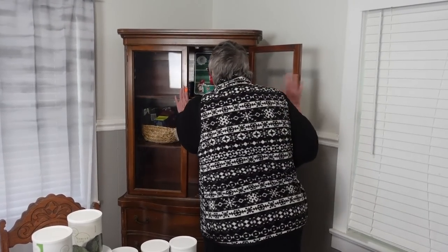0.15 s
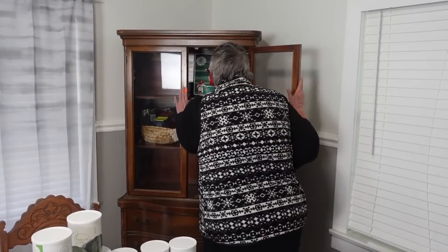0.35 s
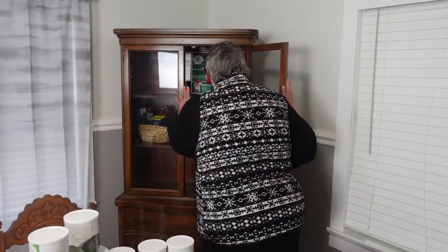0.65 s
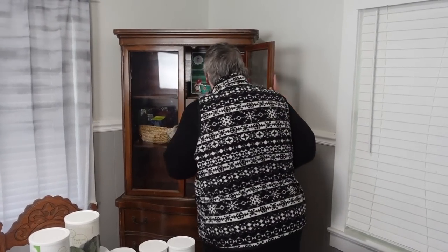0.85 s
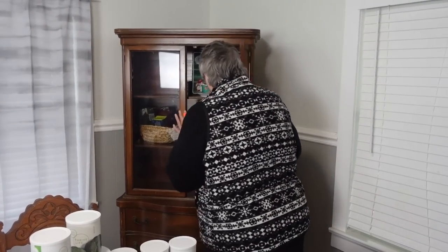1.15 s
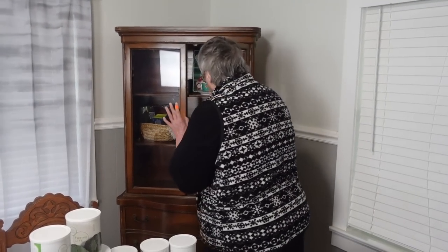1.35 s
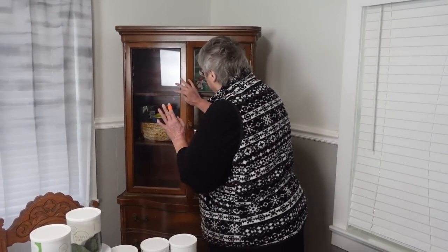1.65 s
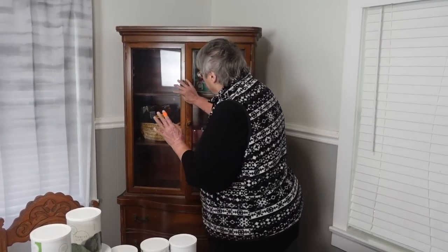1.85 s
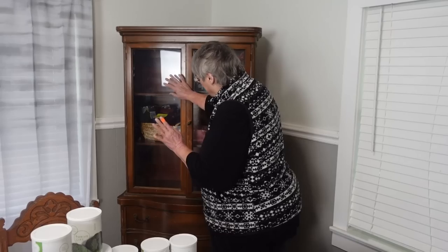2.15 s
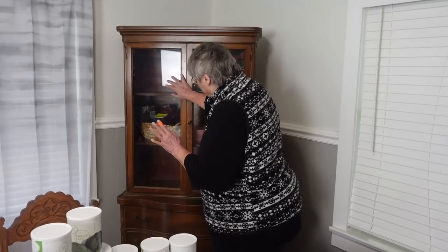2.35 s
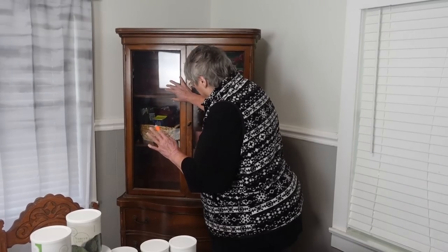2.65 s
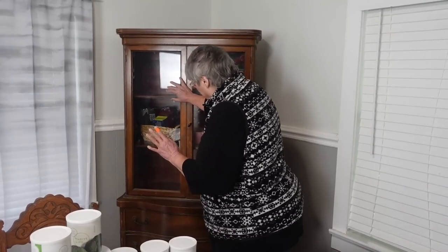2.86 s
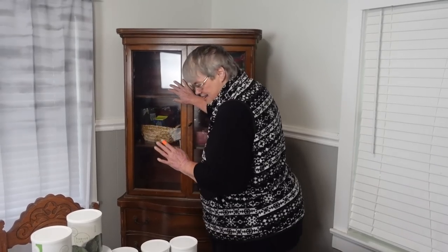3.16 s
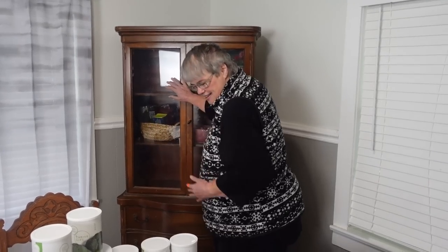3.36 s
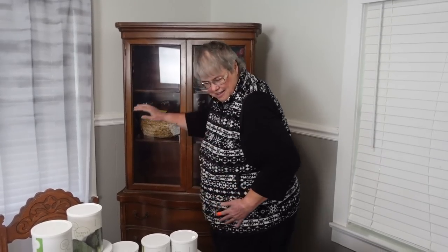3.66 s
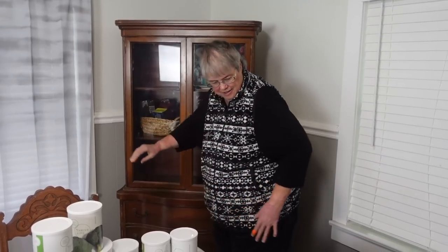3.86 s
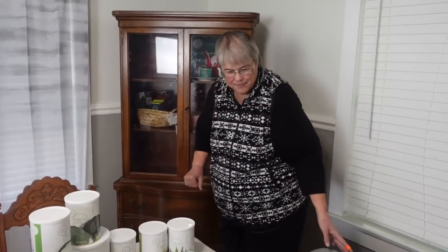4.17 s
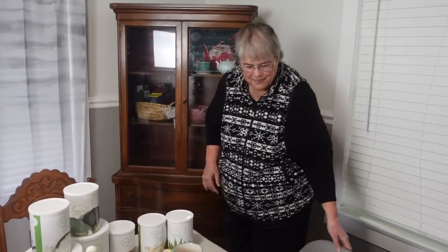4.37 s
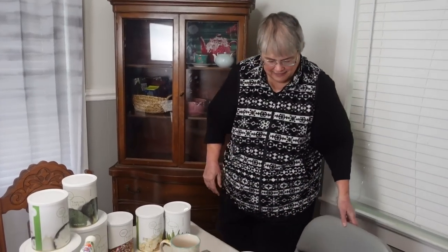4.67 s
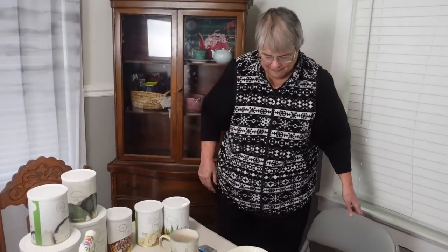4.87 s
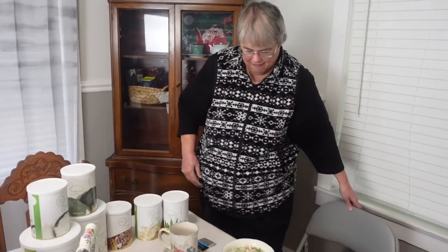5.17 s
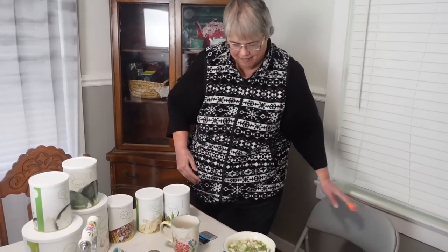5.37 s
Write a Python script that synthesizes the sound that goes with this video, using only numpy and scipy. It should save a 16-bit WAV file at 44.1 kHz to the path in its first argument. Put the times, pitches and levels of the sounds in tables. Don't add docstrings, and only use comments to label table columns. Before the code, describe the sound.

Heard from a few metres away in an echoing home: one sharp boomy wooden bang with a small rebound, a lull, faint sole rubs, then another bang with rattling glass. Light footfalls and scuffs move about. Near the end, chair feet tick and grate on boards, the tube frame hums and rattles, and the legs slam down twice. The limiter flattens loud peaks over steady soft hiss.

```python
import sys
import numpy as np
from scipy import signal
from scipy.io import wavfile
from scipy.ndimage import uniform_filter1d

SR = 44100
rng = np.random.default_rng(int(sys.argv[2]) if len(sys.argv) > 2 else 0)


def log_audio(samples):
    frames = np.atleast_2d(samples).T
    limited = np.clip(frames, -1, 1)
    pcm = np.round(limited * 32767).astype(np.int16)
    wavfile.write(sys.argv[1], SR, pcm)


def volts(x):
    e = np.asarray(x, float) / 20
    return 10 ** e


N = 243431

BAND_EDGES = 36 * 2 ** np.arange(0, 9.1, 1 / 3)

RUMBLE_LOW_HZ, RUMBLE_HIGH_HZ = 12.85, 22.94
RUMBLE_DB, RUMBLE_EVENING_S = -20, 0.49

# frequency in Hz, level in dB per Hz.
HISS_COLOUR = [(38, -21), (60, -26.5), (120, -24), (170, -25.5), (270, -19.5), (650, -32.5), (1200, -35),
               (2100, -35), (4800, -43), (8000, -50), (16000, -55.5)]
HISS_DB = -47.5

# start in seconds, level in dB.
FLOOR_LOADS = [(0.07, -29), (0.3, -4), (1.2, -40), (1.68, -27), (2.03, -2), (2.18, -9.5), (2.33, -25),
               (2.442, 0), (2.56, -12), (2.97, -26), (3.24, -19), (4.07, -11.5), (4.3, -21), (4.52, -30),
               (4.95, 1.5), (5.1, 0), (5.38, -24)]
# frequency in Hz, level in dB per Hz.
FLOOR_COLOUR = [(38, -28), (60, 0), (90, -4), (140, -9.5), (300, -90), (16000, -120)]
FLEX_RISE_S, FLEX_T60_S, FLEX_REST_DB = 0.0086, 0.58, -34

# frequency in Hz, time to fall by 60 dB in seconds.
ROOM_T60 = [(50, 0.95), (120, 0.47), (300, 0.63), (1000, 0.65), (3000, 0.55), (4900, 0.68), (7500, 0.59),
            (16000, 0.22)]
ROOM_DB, ROOM_BUILD_S = 3.5, 0.0014

# time in seconds, level in dB.
CREAK = [(2.85, -58), (2.896, -71), (3.108, -62), (3.16, -82), (3.208, -49), (3.3, -68)]
# frequency in Hz, width in Hz, level in dB.
CREAK_TONES = [(2020, 78, 3), (4300, 170, -14.5)]
# frequency in Hz, level in dB, time to fall by 60 dB in seconds.
RIVET_MODE = [(12000, -36, 0.2)]

# start in seconds, force in dB, brightness in dB per octave.
TICKS = [(0.2783, -6.5, 6), (0.503, -26.5, 3.5), (0.98, -47, 3.5), (1.262, -42, 1), (2.4257, -1.5, -16),
         (2.4388, -22, -2), (2.6594, -21, -1), (2.9467, -49, 2.5), (3.0947, -38, 1.3), (3.4415, -22.5, -1),
         (4.4052, -25, 1.5), (4.4547, -33, 2.2), (4.4644, -36, 4), (4.5366, -30.5, 2), (4.6796, -32.5, 5),
         (4.758, -23, -2), (5.0893, -18, -3)]
# frequency in Hz, level in dB per Hz.
TICK_COLOUR = [(200, 11), (800, 15.5), (3000, 4.5), (8000, -5), (16000, -19)]
TICK_T60_S, TICK_ROOM_DB = 0.024, -5

# time of fullest sound in seconds less the speeding up, speeding up
# in seconds, slowing down in seconds, level in dB, brightness in dB per octave.
SHUFFLES = [(-0.05, 0.036, 0.02, -13, -4), (0.07, 0.035, 0.39, -40, -6), (0.78, 0.13, .08, -54, 3),
            (0.95, 0.12, 0.27, -46.5, 2.3), (1.42, 0.027, 0.056, -41.5, -3), (1.501, 0.14, 0.1, -25.5, 0),
            (1.9, 0.15, 0.16, -21.5, -0.95), (2.3, 0.12, 0.053, -32, -2.5), (3.27, 0.09, 0.16, -44, -3),
            (3.43, 0.084, 0.11, -28.5, 1.7), (3.68, 0.085, 0.077, -42, -1.5),
            (3.798, 0.042, .075, -29, -0.9), (4.071, 0.041, 0.097, -23, 1.4), (4.24, 0.043, .085, -29, 2.3),
            (4.9, 0.033, .19, -39, 1), (5.12, 0.11, 0.78, -34, -2), (5.45, 0.12, .05, -60, 15)]
# frequency in Hz, level in dB per Hz.
SOLE_COLOUR = [(40, 1), (120, -18.5), (250, -7), (600, -3), (1500, -4.5), (3000, -6), (4800, -7.5),
               (7000, -17), (11000, -24.5), (16000, -30.5)]
SET_OFF_DB, COME_TO_REST_DB = -14.5, -16
DULLING_DB_PER_OCTAVE = -3
LIGHT_TOUCH_DB_PER_OCTAVE = 0
PATCHY_DB, PATCHES_PER_S = 2.5, 6.1

# start in seconds, force in dB, brightness in dB per octave, body ring in dB.
STEPS = [(1.919, -22, 2.8, -14), (1.948, -25.5, -3, -26), (2.051, -15.5, -1.3, -19),
         (2.309, -25.5, -7, -17), (2.349, -25.5, -3, -3), (2.855, -28, -2, 11), (3.181, -19.5, -2, 3),
         (3.19, -21, 5, -3), (3.208, -19.5, -2, -5.5), (3.44, -28.5, 4, 0), (3.83, -43, 9, -10),
         (4.078, -14.5, 8, 1), (4.29, -30, -0.5, 2)]
# frequency in Hz, level in dB per Hz.
STEP_CRACK = [(40, 5.5), (100, -5), (250, -4), (500, -13), (900, -17), (1500, -25.5), (4000, -33.5),
              (7000, -52), (16000, -90)]
# frequency in Hz, level in dB, time to fall by 60 dB in seconds.
BOARD_MODES = [(61, -20, 0.1), (106, 7.5, 0.28), (254, -21, 0.073), (494, 5.5, 0.075), (600, 2, 0.032),
               (777, -5, 0.039), (1230, -12, 0.014)]

# time in seconds, level in dB.
DRAG = [(4.42, -24), (4.448, -42), (4.51, -29), (4.518, -23), (4.706, -20.5), (4.832, -23.5),
        (4.864, -20.5), (4.88, -21)]
# frequency in Hz, level in dB per Hz.
DRAG_COLOUR = [(40, -20), (150, -17), (260, 6.5), (600, -14), (1000, -10.5), (2200, -18), (4000, -19.5),
               (8000, -28), (16000, -35)]
# frequency in Hz, width in Hz, level in dB.
FRAME_TONES = [(216, 22, 10.5), (283, 8.8, 9), (580, 36, 1), (962, 38, -3.5), (1431, 12, -3),
               (1570, 80, -7), (2125, 110, -7), (2390, 35, -7), (11800, 450, -16), (12400, 900, -20),
               (13100, 600, -23)]

# start in seconds, force in dB, brightness in dB per octave, body ring in dB.
CHAIR_HITS = [
    (4.475, -20, 2.5, -2),
    (4.519, -15.5, -1.5, 3.5),
    (4.619, -19.5, 1, -3),
    (4.859, -25, -5, 6),
    (4.895, 8, 1.4, -3.5),
    (5.082, 3, 0, 5.5),
]
# frequency in Hz, level in dB per Hz.
CHAIR_CRACK = [(40, -11), (110, -11), (170, -0.5), (290, -2), (500, -6.5), (900, -16), (1600, -19),
               (2600, -28.5), (5000, -37), (9000, -51.5), (16000, -54)]
# frequency in Hz, level in dB, time to fall by 60 dB in seconds.
CHAIR_MODES = [(116, 0, 0.56), (135, -22, 0.18), (202, 3.5, 0.23), (215, -25, 0.18), (293.4, 9, 0.15),
               (364, -4, 0.26), (469, 3, 0.16), (585, 0, 0.13), (735, -29, .05), (817, 2, 0.043),
               (1150, -28, 0.041)]
# frequency in Hz, level in dB, time to fall by 60 dB in seconds.
BACK_LEG_MODES = [(117.3, 0, 0.43), (232.5, -3, 0.17), (283, 1, 0.4), (391, 0.5, 0.16), (500, 0, 0.1),
                  (705, 3.5, 0.016), (940, -3, 0.026)]
# start in seconds, force in dB.
HINGE_HITS = [(4.4091, -24), (4.4897, -32), (4.6864, -37), (4.758, -32.8)]
# frequency in Hz, level in dB, time to fall by 60 dB in seconds.
HINGE_MODES = [(1670, -2.5, 0.061), (1740, -45, 0.089), (1920, 0, 0.081), (2200, -1, 0.063),
               (2540, 1, 0.038), (2860, -4, 0.052), (4010, -0.5, 0.023)]

# start in seconds, force in dB, brightness in dB per octave, body ring in dB.
DOOR_HITS = [
    (0.14, -32.5, -2, 7),
    (0.279, 4.5, 0.44, 0.5),
    (0.352, -9, 5.5, -8),
    (2.4256, 2.5, 0.56, 5),
    (2.545, -8, -0.5, 1),
]
# frequency in Hz, level in dB per Hz.
DOOR_CRACK = [(40, -40), (100, 4), (220, 0.5), (400, -7), (800, -11), (1500, -14.5), (2800, -20),
              (4000, -20), (5200, -19), (6800, -28.5), (10000, -40.5), (16000, -47)]
# frequency in Hz, level in dB, time to fall by 60 dB in seconds.
FIRST_DOOR_MODES = [(78.2, -9.5, 1.26), (103.3, 1.5, 0.51), (186.4, 7, 0.2), (227, -3.5, 0.45),
                    (253.7, -2, 0.44), (353, -4.5, 0.053), (405, -16, 0.11), (550, -14, 0.06),
                    (1202, -2, 0.059)]
# frequency in Hz, level in dB, time to fall by 60 dB in seconds.
SECOND_DOOR_MODES = [(48.6, -2, 0.6), (69.4, 0.5, 0.31), (120, -32, 0.18), (235, -11, 0.13),
                     (269, -15, 0.51), (378.6, -9.5, 0.28), (539, 1, 0.083), (657, -3, 0.085),
                     (937, -9, 0.12), (1294, -3, 0.046), (2089, -2.5, 0.03), (3400, -1, 0.0084)]

CONTACT_CYCLES = 0.49
CRACK_RISE_S = 0.0077
LIMIT_DB, RELEASE_DB_PER_S, ATTACK_S = -2, 133, 0.0012
TOP_CUT_HZ = 15900


def rms_one(x):
    return x / np.sqrt(np.mean(x ** 2) + 1e-20)


def at_hz(points, hz):
    points = np.array(points)
    return np.interp(np.log(hz), np.log(points[:, 0]), points[:, 1])


def in_time(rows):
    s, *columns = np.transpose(rows)
    t = np.arange(N) / SR
    gate = np.clip(np.minimum(t - s[0], s[-1] - t) / 0.005, 0, 1)
    return gate, [np.interp(t, s, c) for c in columns]


def one_pole(x, seconds):
    r = np.exp(-1 / (seconds * SR))
    return signal.lfilter([1 - r], [1, -r], x)


def density(spectrum, hz):
    grid = np.linspace(BAND_EDGES[0], BAND_EDGES[-1], num=4000)
    return volts(at_hz(spectrum, hz)) ** 2 / np.mean(volts(at_hz(spectrum, grid)) ** 2)


def noise_bands(power):
    white = rng.standard_normal((2, N))
    out = 0
    for k, (low, high) in enumerate(zip(BAND_EDGES, BAND_EDGES[1:])):
        band = signal.butter(2, [low, high], "band", fs=SR, output="sos")
        loudness = np.sqrt(power(np.sqrt(low * high)))
        out = out + signal.sosfilt(band, white[k % 2] * loudness)
    return out


def strikes(times, gains):
    out = np.full(N, 1e-18)
    np.add.at(out, np.round(np.asarray(times) * SR).astype(int), gains)
    return out


def dying(impulses, t60):
    return signal.lfilter([1], [1, -volts(-120 / (t60 * SR))], impulses)


def ring(clicks, hz, t60):
    r = volts(-60 / (t60 * SR))
    w = 2 * np.pi * hz / SR
    return signal.lfilter([0, np.sin(w)], [1, -2 * r * np.cos(w), r * r], clicks)


def cracks(hits, crack, hz):
    s, force_db, tilt = np.transpose(hits)[:3]
    colour_db = np.clip(tilt, -4, 3) * np.log2(hz / 1000)
    return strikes(s, density(crack, hz) * volts(force_db + colour_db) ** 2)


def body(hits, modes, shake_t60, ring_db, shake_db, most_db=4):
    s, force_db, *colour = np.transpose(hits)
    body_db = np.minimum(colour[-1], most_db) if colour else 0
    blow = strikes(s, volts(force_db + body_db + ring_db))
    shake = volts(shake_db) * np.sqrt(dying(blow ** 2, shake_t60))
    white = rng.standard_normal((len(modes), N)) / np.sqrt(shake_t60 * SR / 14)
    out = 0
    for k, (hz, mode_db, t60) in enumerate(modes):
        push = one_pole(blow, CONTACT_CYCLES / hz) + shake * white[k]
        out = out + (-1) ** k * volts(mode_db) * ring(push, hz, t60)
    return out


def grit(rough_db, per_s):
    steps = rng.standard_normal(N // 20 + 2)
    r = np.exp(-40 * np.pi * per_s / SR)
    flicker = rms_one(signal.lfilter([1], [1, -r], steps))
    return volts(rough_db * np.interp(np.arange(N) / 20, np.arange(len(steps)), flicker))


def room(power, hz):
    tail = one_pole(power, at_hz(ROOM_T60, hz) / np.log(1e6))
    return power + volts(ROOM_DB) ** 2 * one_pole(tail, ROOM_BUILD_S)


def rumble():
    band = signal.butter(3, [RUMBLE_LOW_HZ, RUMBLE_HIGH_HZ], "band", fs=SR, output="sos")
    swell = signal.sosfilt(band, rng.standard_normal(N + SR))[SR:]
    strength = np.sqrt(uniform_filter1d(swell ** 2, size=int(RUMBLE_EVENING_S * SR)))
    return volts(RUMBLE_DB) * swell / strength


def hiss(hz):
    return volts(HISS_DB) ** 2 * density(HISS_COLOUR, hz)


def floor_flex():
    s, level_db = np.transpose(FLOOR_LOADS)
    loads = strikes(s, volts(level_db) ** 2)
    return one_pole(dying(loads, FLEX_T60_S), FLEX_RISE_S) + volts(FLEX_REST_DB) ** 2


def fittings():
    gate, (level_db,) = in_time(CREAK)
    slips = gate * volts(level_db) * rng.standard_normal(N)
    out = 0
    for hz, width_hz, peak_db in CREAK_TONES:
        out = out + volts(peak_db - 44.5) * width_hz / 4 * ring(slips, hz, 3.3 / width_hz)
    for hz, level_db, t60 in RIVET_MODE:
        out = out + ring(strikes([5.09], volts(level_db)), hz, t60)
    return out


def shuffles():
    level, tilt = 1e-9, 0
    for s, rise, fall, level_db, bright in SHUFFLES:
        gate, (phase,) = in_time([(s, -1), (s + rise, 0), (s + rise + fall, 1)])
        end_db = np.where(phase < 0, SET_OFF_DB, COME_TO_REST_DB)
        slide = gate * volts(level_db - 9.5 + phase ** 2 * end_db)
        colour = bright + DULLING_DB_PER_OCTAVE * phase / 2
        colour = colour + LIGHT_TOUCH_DB_PER_OCTAVE * (phase ** 2 - 0.5)
        level = level + slide
        tilt = tilt + slide * colour
    return (level * grit(rough_db=3.5, per_s=16)) ** 2, tilt / level


def boards():
    return body(STEPS, BOARD_MODES, shake_t60=0.18, ring_db=-8.5, shake_db=-2.0)


def drag():
    gate, (level_db,) = in_time(DRAG)
    force = gate * volts(level_db) * grit(rough_db=2.0, per_s=22)
    hum = 0
    for hz, width_hz, peak_db in FRAME_TONES:
        slips = force * grit(rough_db=4.5, per_s=11) * rng.standard_normal(N)
        hum = hum + volts(peak_db - 57.5) * np.sqrt(width_hz) * ring(slips, hz, 3.6 / width_hz)
    return force, hum


def chair():
    out = body(CHAIR_HITS[:5], CHAIR_MODES, shake_t60=0.3, ring_db=-6, shake_db=-8.0)
    out += body(CHAIR_HITS[5:], BACK_LEG_MODES, shake_t60=0.26, ring_db=-4, shake_db=-7)
    out += body(HINGE_HITS, HINGE_MODES, shake_t60=0.25, ring_db=-10, shake_db=9.5)
    return out


def doors():
    out = body(DOOR_HITS[:3], FIRST_DOOR_MODES, shake_t60=0.55, ring_db=-10.0, shake_db=-1.0)
    out += body(DOOR_HITS[3:], SECOND_DOOR_MODES, shake_t60=0.53, ring_db=-8, shake_db=-3.0)
    return out


def scene():
    rub, tilt = shuffles()
    force, hum = drag()
    flex = floor_flex()

    def power(hz):
        blows = dying(cracks(DOOR_HITS, DOOR_CRACK, hz), t60=0.036)
        blows += dying(cracks(STEPS, STEP_CRACK, hz), t60=0.041)
        blows += dying(cracks(CHAIR_HITS, CHAIR_CRACK, hz), t60=0.034)
        ticks = dying(cracks(TICKS, TICK_COLOUR, hz), TICK_T60_S)
        friction = rub * density(SOLE_COLOUR, hz) * volts(tilt * np.log2(hz / 2000)) ** 2
        friction += (volts(-15.5) * force) ** 2 * density(DRAG_COLOUR, hz)
        friction *= grit(PATCHY_DB, PATCHES_PER_S) ** 2
        steady = hiss(hz) + volts(-12.0) ** 2 * flex * density(FLOOR_COLOUR, hz)
        into_room = one_pole(blows, CRACK_RISE_S) + friction + volts(TICK_ROOM_DB) ** 2 * ticks
        return room(into_room, hz) + ticks + steady

    background = rumble() + fittings()
    mix = background + noise_bands(power) + boards() + hum + chair() + doors()
    return mix[None]


def low_pass(x):
    return signal.sosfilt(signal.butter(12, 16530, fs=SR, output="sos"), x)


def record(dry):
    t = np.arange(N) / SR
    over_db = np.maximum(20 * np.log10(np.abs(dry[0]) + 1e-9) - LIMIT_DB, 0)
    held_db = np.maximum.accumulate(over_db + RELEASE_DB_PER_S * t) - RELEASE_DB_PER_S * t
    duck_db = np.roll(one_pole(held_db, ATTACK_S), shift=-40)
    limited = np.clip(dry * volts(-duck_db), -1, 1)
    top_cut = signal.cheby2(14, 35, TOP_CUT_HZ, fs=SR, output="sos")
    return low_pass(signal.sosfilt(top_cut, limited))


dry = scene()
out = record(dry)
log_audio(out)
```